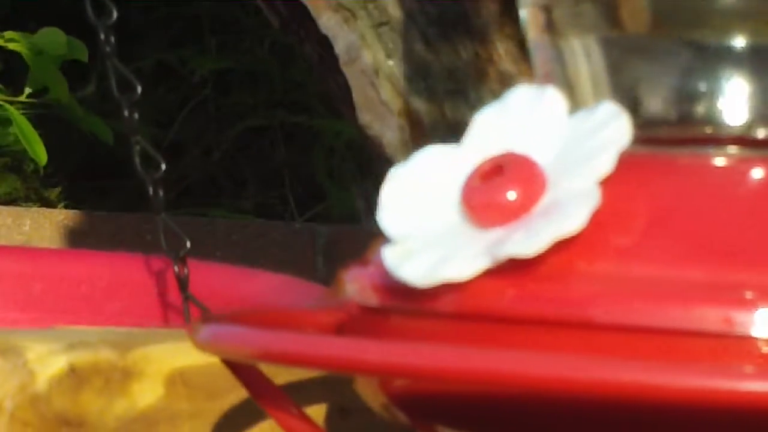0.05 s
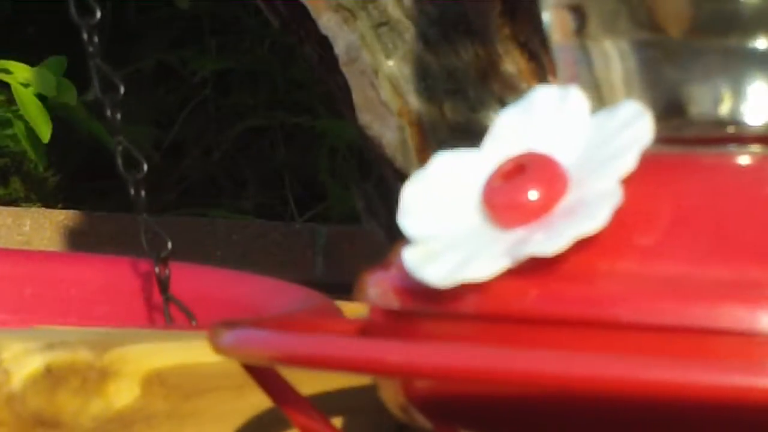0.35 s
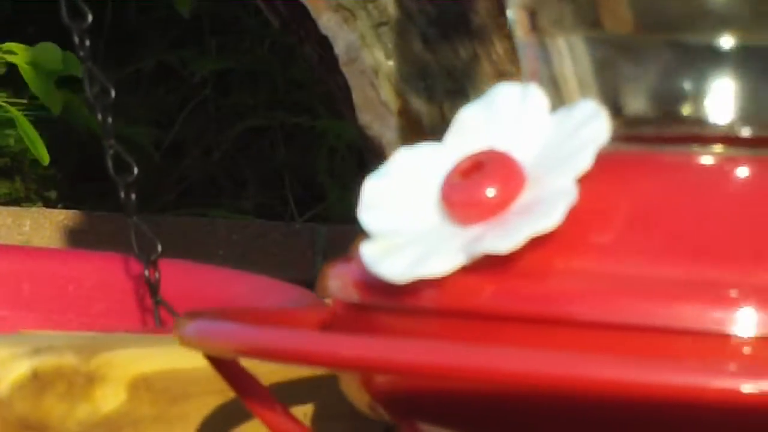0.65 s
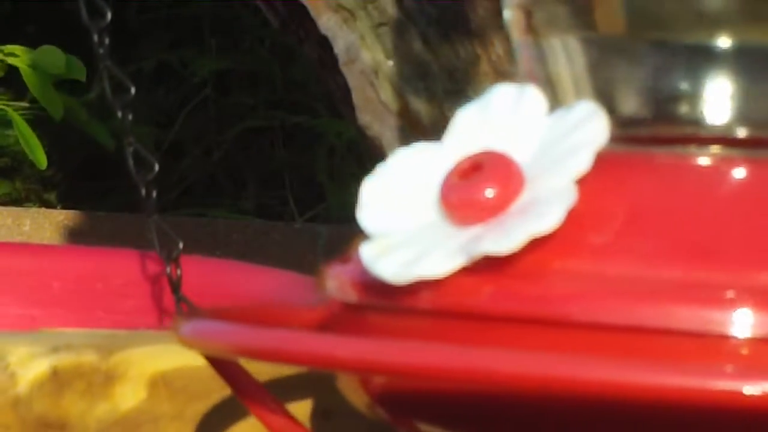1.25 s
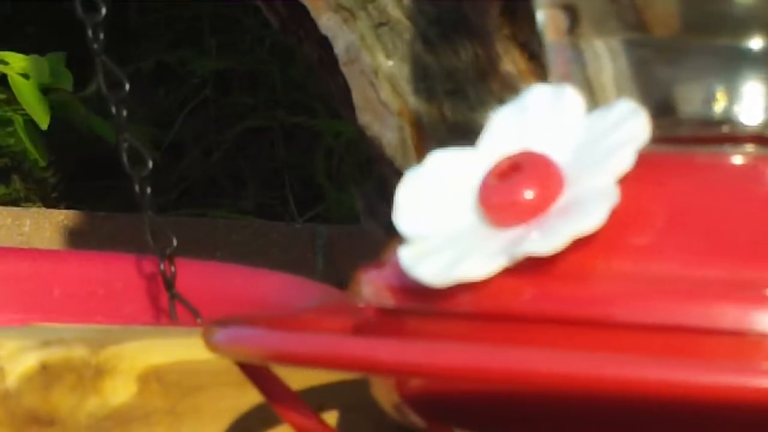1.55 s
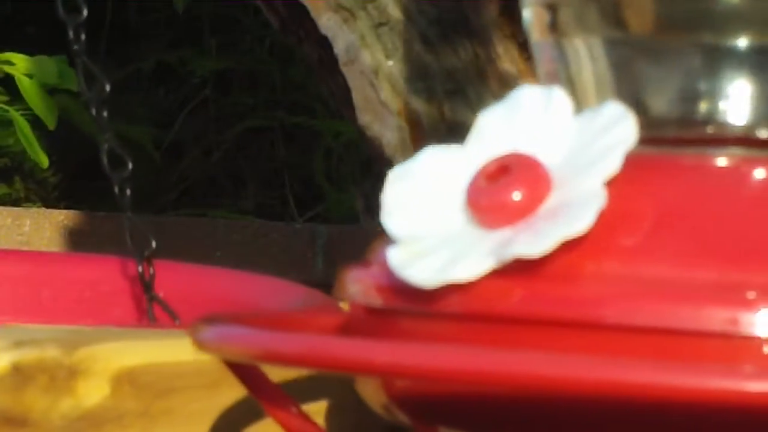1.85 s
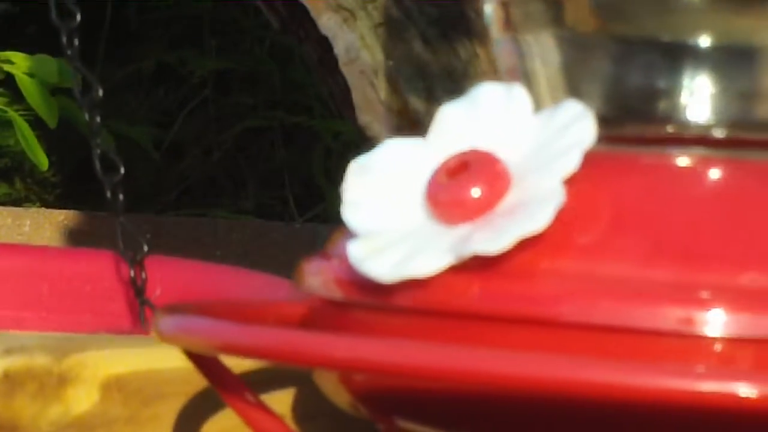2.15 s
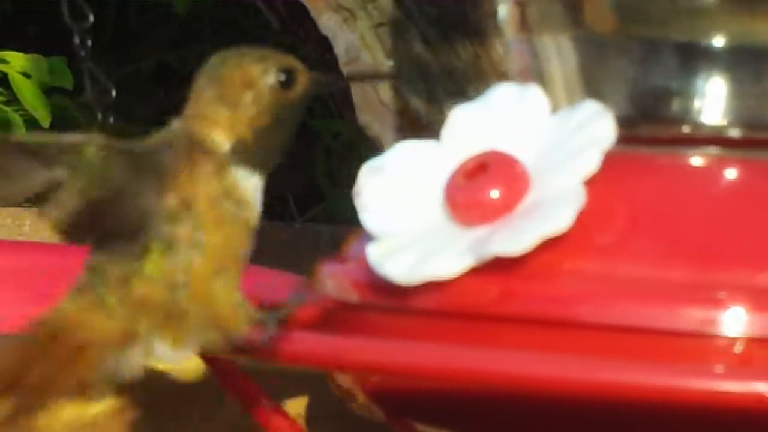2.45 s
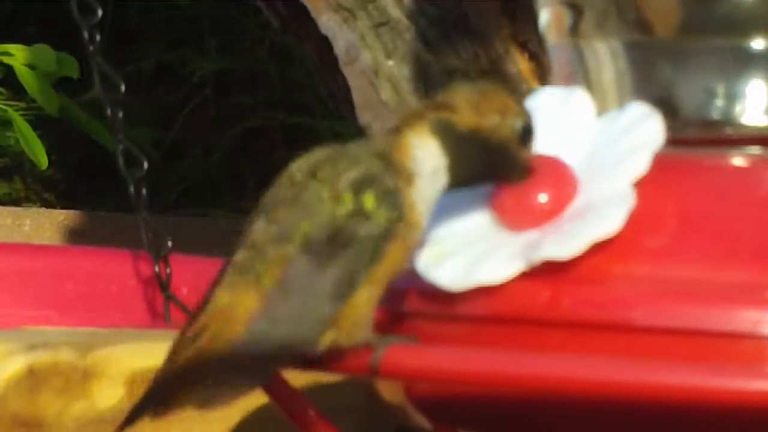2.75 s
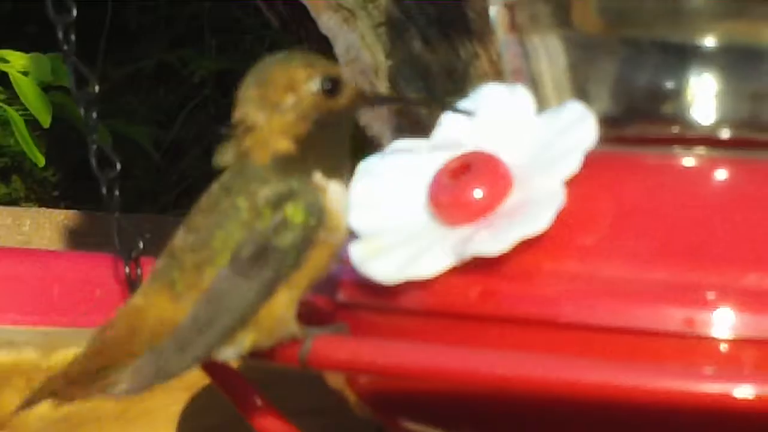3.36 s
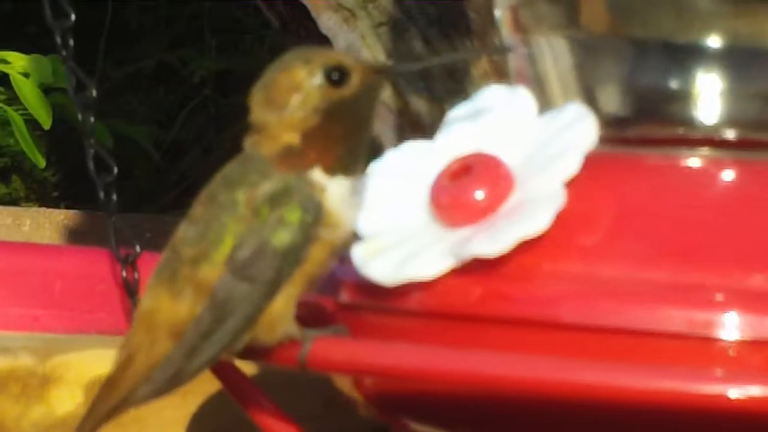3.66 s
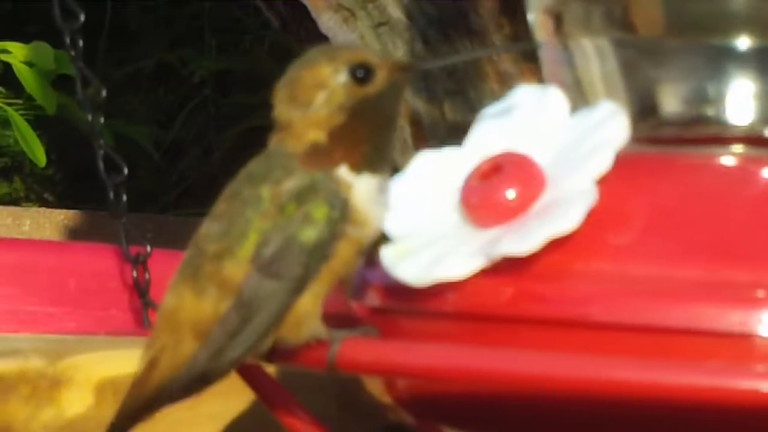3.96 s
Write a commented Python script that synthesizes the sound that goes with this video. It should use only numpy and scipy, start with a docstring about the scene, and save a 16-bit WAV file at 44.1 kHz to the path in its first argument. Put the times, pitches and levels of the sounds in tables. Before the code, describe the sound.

Hummingbird wings trill thinly over a soft hum, then it lands, with low wind rumble.

```python
"""Hummingbird at a garden feeder

A hummingbird darts about, hovers close, gives two sharp chips and lands on the perch with tiny taps.
Each wingbeat makes the outer feathers whistle briefly: a thin, high trill over a soft hum and rustle.
Wind rumbles on the microphone, and the outdoor wash swells as the bird settles."""
import sys
import numpy as np
from scipy import signal
from scipy.fft import rfft, irfft
from scipy.io import wavfile

SR = 44100
rng = np.random.default_rng(int(sys.argv[2]) if len(sys.argv) > 2 else 0)


def unload_wav(signal):
    """Save mono or channel-first audio to the path in sys.argv[1] as 16-bit WAV at rate SR, clipped to [-1, 1]."""
    wavfile.write(
        sys.argv[1],
        SR,
        np.round(np.clip(np.atleast_2d(signal).T, -1, 1) * 32767).astype(np.int16),
    )


N = 176400
TIME = np.arange(N) / SR


# Wingbeat tempo: t/s, rate/Hz
WINGBEAT = [(0.0, 57.01), (0.3, 58.02), (0.62, 55.7), (0.77, 66.01), (0.9, 59.68), (1.1, 54.88),
            (1.23, 63.2), (1.31, 63.48), (1.38, 70.75), (1.52, 60.69), (1.68, 60.62), (1.83, 56.05),
            (1.93, 64.89), (2.08, 61.92), (2.24, 58.9), (2.33, 64.33), (2.4, 59.95), (2.5, 65.85),
            (2.8, 58.19)]

def wingbeats():
    """The running count of wingbeats: the clock for trill, hum and rustle."""
    return np.cumsum(curve(WINGBEAT)) / SR + .055


def whistle(length, hz, glide):
    """One feather whistle: a smooth blip whose pitch slides, flutters and dips in the middle."""
    u = np.linspace(-1, 1, max(int(length * SR), 8))
    flutter = np.interp(u, np.linspace(-1, 1, num=8), rng.standard_normal(size=8))
    pitch = hz * (1 + .21 * u ** 2 + glide * u + .02 * flutter)
    return np.cos(np.pi * u / 2) ** 2 * np.sin(2 * np.pi * (np.cumsum(pitch) / SR + rng.random()))


# Fader ride of the trill: t/s, relative level/dB
TRILL_LEVEL = [(0, -76), (.02, -74), (.036, -60), (.06, -68), (.09, -67), (.115, -63), (.145, -76),
               (.16, -73), (.175, -56), (.192, -66), (.208, -54), (.23, -62), (.243, -60), (.26, -72),
               (.277, -58), (.294, -56), (.312, -69), (.329, -61), (.347, -71), (.382, -61), (.415, -72),
               (.435, -63), (.47, -69), (.505, -65), (.523, -73), (.545, -59), (.578, -70), (.61, -58),
               (.635, -70), (.71, -73), (.73, -59), (.76, -51), (.795, -52), (.83, -56), (.86, -62),
               (.93, -72), (1.042, -68), (1.17, -78), (1.215, -58), (1.26, -51), (1.30, -54), (1.343, -49),
               (1.355, -42), (1.385, -37), (1.413, -37), (1.428, -33), (1.46, -38), (1.49, -42),
               (1.507, -48), (1.523, -63), (1.555, -56), (1.64, -56), (1.655, -62), (1.68, -55),
               (1.721, -53), (1.772, -66), (1.805, -50), (1.84, -66), (1.858, -57), (1.91, -52),
               (1.94, -54), (1.971, -44), (2.07, -64), (2.147, -54), (2.165, -68), (2.18, -55), (2.2, -47),
               (2.214, -41.5), (2.231, -63), (2.248, -68), (2.265, -54), (2.282, -53), (2.295, -36.5),
               (2.328, -62), (2.377, -52), (2.411, -61), (2.435, -48), (2.458, -42), (2.489, -50),
               (2.503, -66), (2.52, -57), (2.535, -66), (2.566, -68), (2.7, -86)]
# Tuning of the whistles: t/s, f/Hz, glide/share of f per half whistle
TRILL_PITCH = [(0, 9400, -.16), (.2, 9550, -.17), (.28, 9850, -.19), (.37, 9450, -.16), (.55, 9700, -.15),
               (.75, 9300, -.06), (.85, 9500, -.04), (1.25, 9580, -.04), (1.34, 9500, -.01),
               (1.39, 9700, .07), (1.43, 9380, -.02), (1.5, 9480, -.03), (1.6, 9600, .05), (1.75, 9450, 0),
               (1.9, 9220, -.05), (1.97, 9520, .09), (2.02, 9800, .06), (2.07, 9480, -.04),
               (2.2, 9320, -.03), (2.28, 9380, .02), (2.31, 8950, .04), (2.34, 9480, .11), (2.4, 9500, .06),
               (2.45, 9100, .09), (2.5, 9420, -.02)]

def trill(turns):
    """Both wings whistle once a beat with a scratch of air, longer in loud, fast flight."""
    scratch_db, far_wing_db, far_wing_jitter_s = -22, -9, .001
    out, air = np.zeros(N), band(10200, octaves=.12)
    beats = TIME[1:][np.diff(np.floor(turns)) > 0]
    beats = beats[beats < TRILL_LEVEL[-1][0]]
    for s, (loud, sharp, lag) in zip(beats, rng.standard_normal((len(beats), 3))):
        db, rate = curve(TRILL_LEVEL, s), curve(WINGBEAT, s)
        length = .0023 * np.exp(.022 * (db + 57)) * (rate / 60) ** 2.6
        spread_db = .7 + 1.2 * np.clip((-52 - db) / 10, 0, 1)  # weak whistles are more uneven
        gain = amp(db + .6 + spread_db * loud)
        hz = curve(TRILL_PITCH, s) * (1 + .009 * sharp)
        glide = curve(TRILL_PITCH, s, column=2)
        near_wing = whistle(length, hz, glide)
        far_wing = amp(far_wing_db) * whistle(length, hz, glide)
        scratch = amp(scratch_db) * np.hanning(len(near_wing)) * air[round(s * SR):][:len(near_wing)]
        start = s - length / 2
        add(out, start, gain * (near_wing + scratch))
        add(out, start + far_wing_jitter_s * lag, gain * far_wing)
    return out


# Fader ride of the hum: t/s, level/dB
HUM_LEVEL = [(0, -70), (1.2, -63), (1.42, -52), (1.62, -63.5), (2.15, -61.5), (2.4, -64), (2.55, -48.5),
             (2.7, -72), (2.8, -84)]
# Its harmonics: multiple of the wingbeat, relative level/dB
HUM_HARMONICS = [(1, -4), (2, 4), (3, -5), (4, -4), (5, -6), (6, -7.5)]

def wing_hum(turns):
    """The strokes push air: low, wavering harmonics of the beat."""
    hum = np.zeros(N)
    for k, db in HUM_HARMONICS:
        gain = amp(db) * (1 + .16 * waver(rate_hz=13))
        hum += gain * np.sin(2 * np.pi * (k * turns + rng.random()))
    return amp(curve(HUM_LEVEL)) * unit(hum)


# Fader rides of the rustle: t/s, swish level/dB, fizz level/dB
RUSTLE_LEVEL = [(0, -85, -100), (1.25, -87, -105), (1.39, -68, -83), (1.43, -64, -70), (1.56, -80, -77.5),
                (1.8, -80, -76.5), (1.98, -75, -72), (2.15, -79, -73.5), (2.35, -71.5, -67),
                (2.53, -67, -66), (2.66, -91, -72), (2.85, -85, -81), (3.1, -95, -95)]
# EQ of the feather swish: f/Hz, level/dB
SWISH_EQ = [(500, -16), (2500, 5.5), (4500, -2), (7000, -1.5), (11000, -15), (15000, -27)]
# EQ of the fizz at the feather edges: f/Hz, level/dB
FIZZ_EQ = [(3000, -35), (8000, -7), (11000, -8), (13000, -4.5), (15000, -4.5), (17000, -14)]

def wing_rustle(turns):
    """Feathers swish twice a beat; their fizz flicks up as the wings turn, ahead of each whistle."""
    lead_beats, width_beats = .37, .06
    strokes = unit(np.exp(.6 * np.cos(2 * np.pi * 2 * turns)))
    from_flick = (turns + lead_beats + .5) % 1 - .5
    flicks = unit(1 + 1.9 * np.exp(-.5 * (from_flick / width_beats) ** 2))
    swish = strokes * amp(curve(RUSTLE_LEVEL)) * noise(SWISH_EQ)
    fizz = flicks * amp(curve(RUSTLE_LEVEL, column=2)) * noise(FIZZ_EQ)
    return swish + fizz


# Cues for the calls: t/s, sweep level/dB, starting f/Hz
CHIPS = [(1.072, -55.5, 8800), (1.8257, -51.5, 7850)]

def chips():
    """Very quick downward sweeps that level off into a buzzy note, scattered by things nearby."""
    sweep_s, fall_hz_per_s, overtone_db = .0062, 950000, -24
    buzz_s, buzz_hz = .01, 1980
    out, t = np.zeros(N), np.arange(0, sweep_s, 1 / SR)
    u = np.linspace(0, 1, int(buzz_s * SR))
    buzz_phase = 2 * np.pi * np.cumsum(buzz_hz * (1 + .45 * (1 - u) ** 2)) / SR
    buzz = np.sin(np.pi * u) * sum(np.sin(k * buzz_phase) / k for k in range(1, 5))
    for s, db, hz in CHIPS:
        phase = 2 * np.pi * np.cumsum(hz - fall_hz_per_s * t) / SR
        sweep = np.sin(phase) + amp(overtone_db) * np.sin(2 * phase)
        add(out, s, amp(db) * np.sin(np.pi * t / sweep_s) * sweep)
        add(out, s + .56 * sweep_s, amp(db - 2.5) * buzz)
    return out + amp(-5) * tail(out, t60=.015, delay_s=.0012)


# Cues for the taps: t/s, relative level/dB, centre f/Hz
TAPS = [(2.5471, -52, 8800), (2.917, -56, 13000), (3.0155, -53, 10600), (3.3994, -65, 11000)]

def taps():
    """Feet and bill tick on the plastic, with a soft ring, as the bird lands and drinks."""
    tick_t60, ring_t60, ring_db = .014, .09, -9
    fade = amp(-60 * TIME / tick_t60) + amp(ring_db - 60 * TIME / ring_t60)
    out = np.zeros(N)
    for s, db, hz in TAPS:
        add(out, s, .43 * amp(db) * fade * band(hz, octaves=.45))
    return out


# EQ of the landing whoosh: f/Hz, level/dB
DOWNWASH_EQ = [(40, -23), (90, -11), (150, 6), (300, -4), (420, -8), (750, 3.5), (1200, -6), (2000, -15),
               (5000, -32), (12000, -59)]

def downwash():
    """A soft whoosh of air as the bird brakes over the perch."""
    peak_at_s, rise_s, fall_s, peak_db = 2.525, .051, .14, -46.5
    t = TIME - peak_at_s
    swell = np.exp(-.5 * (t / np.where(t < 0, rise_s, fall_s)) ** 2)
    return amp(peak_db) * swell * noise(DOWNWASH_EQ)


# Pan moves of the bird: t/s, left minus right/dB, left phase lead/rad
BIRD_PAN = [(0, -1.5, 1.25), (.9, -1, 1.25), (1.38, 2, .65), (1.7, 2.4, .7), (2.0, 2.2, .45),
            (2.3, 1.6, .45), (2.5, 1, -.4)]

def place(x):
    """The bird's direction: a level and a phase difference between left and right."""
    right = (signal.hilbert(x) * np.exp(-1j * curve(BIRD_PAN, column=2))).real
    return np.array([x, right]) * pan(curve(BIRD_PAN))


# Early reflections: delay/s, level/dB
ECHOES = [(.0017, -13), (.0043, -19)]

def reflections(direct):
    """The trill bounces off feeder and tree."""
    out = np.zeros(N)
    for delay, db in ECHOES:
        add(out, delay, amp(db) * direct)
    return out


# Reverb send of the trill: t/s, level/dB
REVERB_SEND = [(0, -13), (.65, -13), (.82, -8), (1.0, -12), (1.3, -8), (1.37, -19), (1.45, -21), (1.7, -18),
               (1.93, -14), (2.2, -22), (2.6, -18)]

def garden_reverb(direct):
    """The garden returns a short, diffuse echo."""
    return tail(direct * amp(curve(REVERB_SEND)), t60=.11, delay_s=.0017)


# Fader ride of the gusts: t/s, relative level/dB
WIND_LEVEL = [(0.0, -35), (0.19, -54), (0.21, -40.5), (0.42, -42.5), (0.47, -47), (0.67, -44.5),
              (0.7, -53.5), (0.98, -36), (1.07, -65), (1.09, -42), (1.64, -46.5), (1.68, -44), (1.94, -69),
              (1.96, -50), (2.52, -37.5), (2.57, -47), (2.75, -33), (2.88, -37.5), (2.93, -31),
              (3.01, -39.5), (3.1, -23.5), (3.19, -30), (3.34, -32.5), (3.41, -21), (3.48, -35), (3.5, -27),
              (3.62, -24), (3.66, -32), (3.73, -29), (3.78, -36.5), (3.91, -30.5), (4.0, -22)]
# EQ of the rumble: f/Hz, level/dB
WIND_EQ = [(5, -8), (18, -12), (28, 3.5), (45, -4), (70, -13.5), (110, -22), (200, -33), (500, -54),
           (2000, -101)]
# Cues for sharper buffets: t/s, relative level/dB, centre f/Hz
BUFFETS = [(.34, -49, 70), (1.108, -37, 74.4), (1.197, -39, 43), (3.101, -27.5, 68), (3.38, -32.5, 67),
           (3.61, -31.5, 54), (3.928, -39, 69)]

def wind():
    """Wind on the microphone: a lumpy rumble with a few buffets, stronger on the right."""
    lump_db, buffet_s = 2, .027
    rumble = amp(curve(WIND_LEVEL) + 1 + lump_db * waver(rate_hz=10)) * noise(WIND_EQ)
    for s, db, hz in BUFFETS:
        swell = np.exp(-.5 * ((TIME - s) / buffet_s) ** 2)
        rumble += amp(db) * swell * np.array([band(hz, octaves=.35) for _ in range(2)])
    return rumble * pan(db=-8.5)


# EQ of the steady air: f/Hz, level/dB
AIR_EQ = [(30, 8), (120, 1.5), (260, 4), (430, -2.5), (750, 0), (960, 2.5), (1150, -0.5), (1450, -2),
          (2000, -9), (3200, -18), (4500, -24), (6200, -33.5), (9000, -33), (12300, -39), (14000, -59),
          (16000, -48)]
# EQ of the wash: f/Hz, level/dB
WASH_EQ = [(30, -40), (130, -0.5), (250, 4), (380, 0.5), (700, 0), (1050, -1), (1500, -5), (2200, -10.5),
           (3200, -19.5), (4500, -26), (6500, -34.5), (9000, -40.5), (12500, -39.5), (15000, -56)]
# Fader ride of the wash: t/s, relative level/dB
WASH_LEVEL = [(0, -64.5), (2.1, -62.5), (2.35, -49), (2.55, -44), (2.8, -44), (3.3, -44), (4, -44)]
# Stereo balance of the bed: f/Hz, left minus right/dB
BED_BALANCE = [(60, -25), (190, -2.5), (340, -0.5), (600, -4), (1500, -3), (3300, -1.5), (6000, 0.5),
               (12000, 0)]

def outdoors():
    """The ambience bed: steady air, a swelling wash and a drone, leaning right."""
    bed = amp(-50.5) * noise(AIR_EQ) + amp(curve(WASH_LEVEL)) * noise(WASH_EQ) + drone()
    balance_db = read(BED_BALANCE, np.fft.rfftfreq(N, 1 / SR))
    return irfft(rfft(bed) * pan(balance_db), N)


# Fader rides of the drone: t/s, relative level/dB of the low tone, of the high tone
DRONE_LEVEL = [(0, -81, -79), (1.7, -70, -70.5), (2.1, -61, -72.5), (2.6, -48.5, -54), (3.1, -58, -58),
               (3.3, -63.5, -62), (3.6, -47.5, -64), (4, -49, -66)]

def drone():
    """Two faint, far-off tones that waver in pitch and flicker in level."""
    pitches_hz, flicker_db = (168.1, 462.5), 2.4
    out = np.zeros(N)
    for column, hz in enumerate(pitches_hz, start=1):
        phase = 2 * np.pi * np.cumsum(hz * (1 + .008 * waver(rate_hz=6.83))) / SR
        db = curve(DRONE_LEVEL, column=column) + flicker_db * waver(rate_hz=7.9)
        out += amp(db) * unit(np.sin(phase))
    return out


# Stereo width of the noise layers: f/Hz, left-right correlation
CORRELATION = [(60, -0.59), (260, 0.45), (550, 0.37), (1150, .5), (2400, 0.62), (9000, 0.34), (13000, 0.44)]

def noise(eq):
    """Coloured stereo noise of rms 1, partly alike in the two ears."""
    hz = np.fft.rfftfreq(N, 1 / SR)
    left, other = rfft(rng.standard_normal((2, N)))
    same = np.clip(read(CORRELATION, hz), -1, 1)
    right = same * left + np.sqrt(1 - same ** 2) * other
    return unit(irfft(np.array([left, right]) * amp(read(eq, hz)), N))


def band(centre_hz, octaves):
    """Noise in one soft band."""
    hz = np.fft.rfftfreq(N, 1 / SR)
    bell = np.exp(-.5 * (np.log2((hz + 1) / centre_hz) / octaves) ** 2)
    return unit(irfft(rfft(rng.standard_normal(N)) * bell, N))


def waver(rate_hz):
    """Slow random drift of rms 1."""
    hz = np.fft.rfftfreq(N, 1 / SR)
    return unit(irfft(rfft(rng.standard_normal(N)) * np.exp(-(hz / rate_hz) ** 2), N))


def tail(x, t60, delay_s):
    """Diffuse stereo reverb from a burst of decaying noise."""
    t = np.arange(SR // 2) / SR
    impulse = rng.standard_normal((2, len(t))) * amp(-60 * t / t60) * (t > delay_s)
    return signal.fftconvolve(x[None], impulse / np.linalg.norm(impulse[0]), axes=1)[:, :N]


def amp(db):
    """Decibels to gain."""
    return 10 ** (np.asarray(db) / 20)


def unit(x):
    """Scales to rms 1."""
    return x / np.sqrt(np.mean(x ** 2) + 1e-30)


def curve(rows, t=TIME, column=1):
    """Reads one column of a time table."""
    rows = np.array(rows)
    return np.interp(t, rows[:, 0], rows[:, column])


def read(rows, hz):
    """Reads a table on a log-frequency axis."""
    f, value = np.transpose(rows)
    return np.interp(np.log(hz + 1), np.log(f + 1), value)


def pan(db):
    """Left and right gains for a level difference."""
    return amp(np.array([[.5], [-.5]]) * db)


def add(mix, s, sound):
    """Drops a sound into the mix at a time."""
    part = mix[max(round(s * SR), 0):][:len(sound)]
    part += sound[:len(part)]


def scene():
    """The bird and its echoes over wind and garden ambience."""
    turns = wingbeats()
    direct = trill(turns)
    bird = place(direct + reflections(direct) + taps()) + chips() + garden_reverb(direct)
    return bird + wing_hum(turns) + wing_rustle(turns) + downwash() + wind() + outdoors()


def record(dry):
    """A steep low-pass on the whole mix."""
    cutoff_hz = 15400
    lowpass = signal.firwin(511, cutoff_hz, window=("kaiser", 9), fs=SR)
    return signal.oaconvolve(dry, lowpass[None], "same")


dry = scene()
out = record(dry)
unload_wav(out)
```